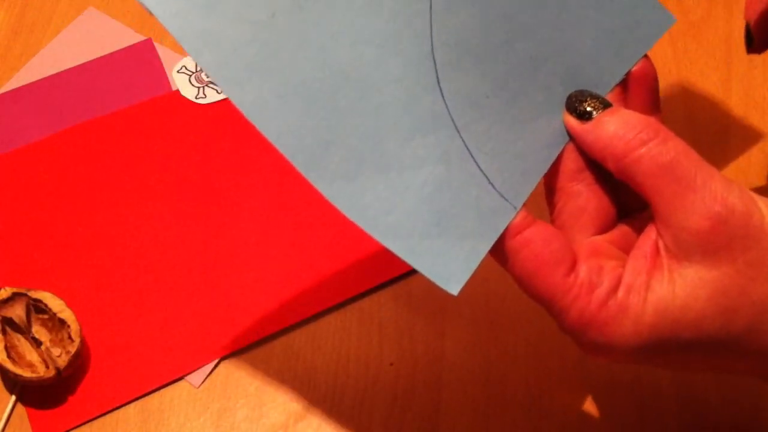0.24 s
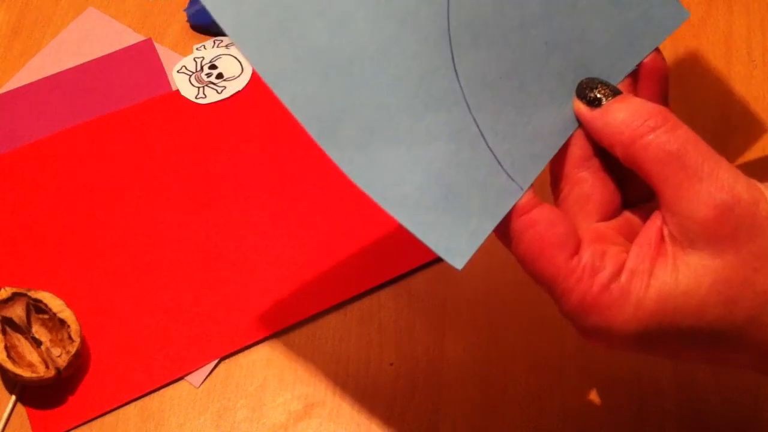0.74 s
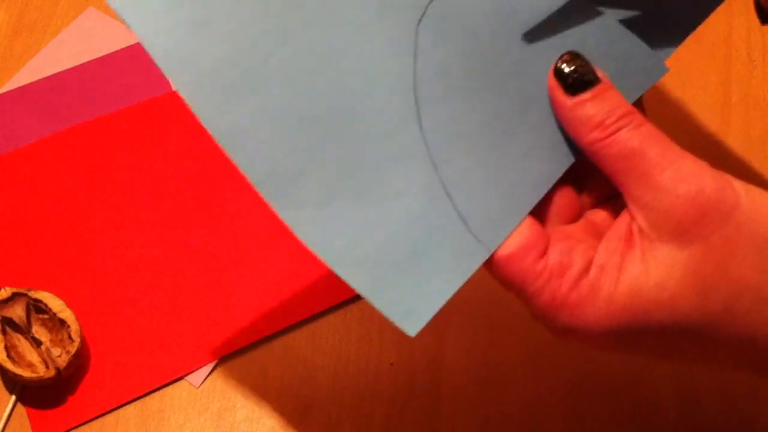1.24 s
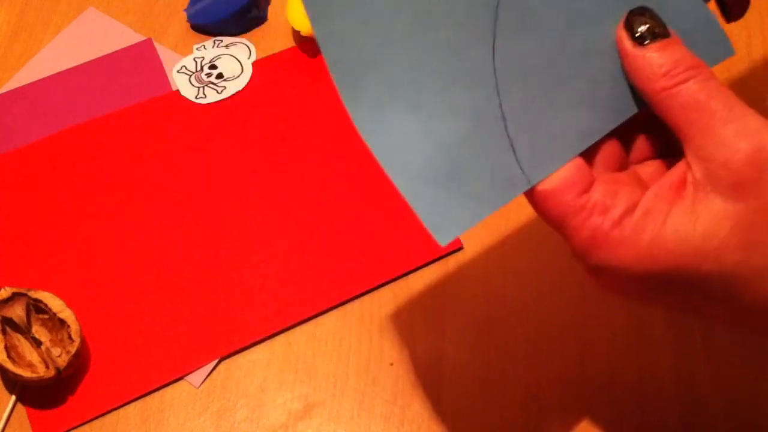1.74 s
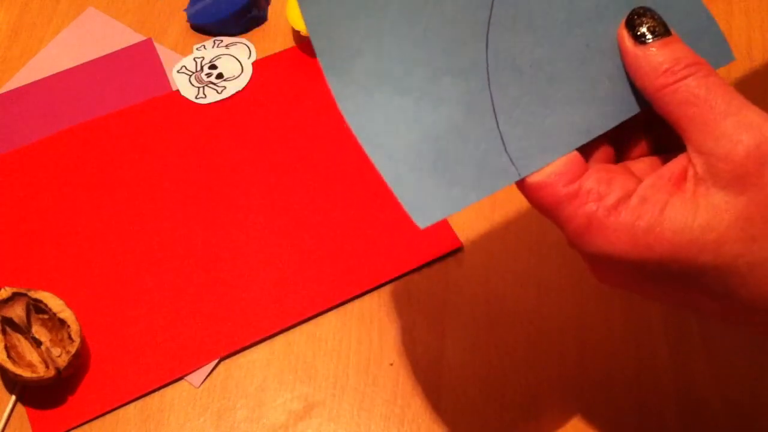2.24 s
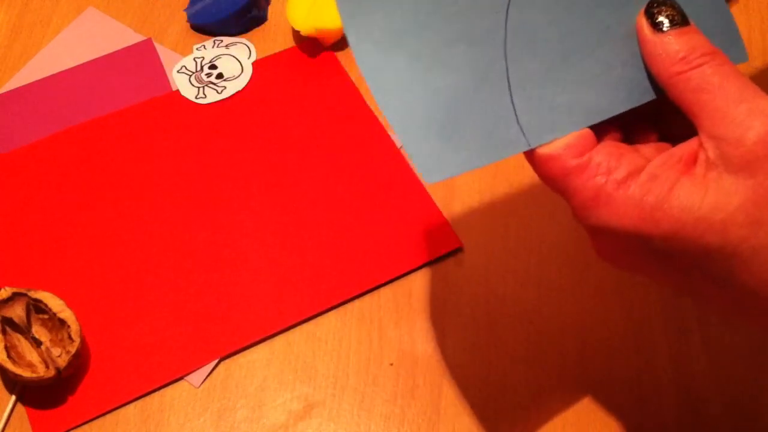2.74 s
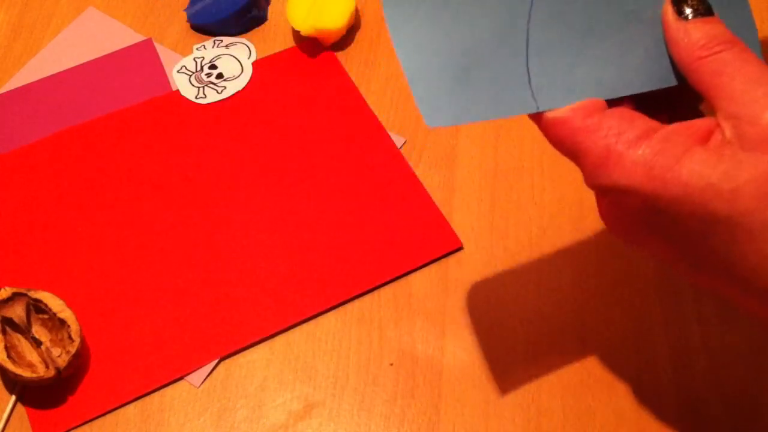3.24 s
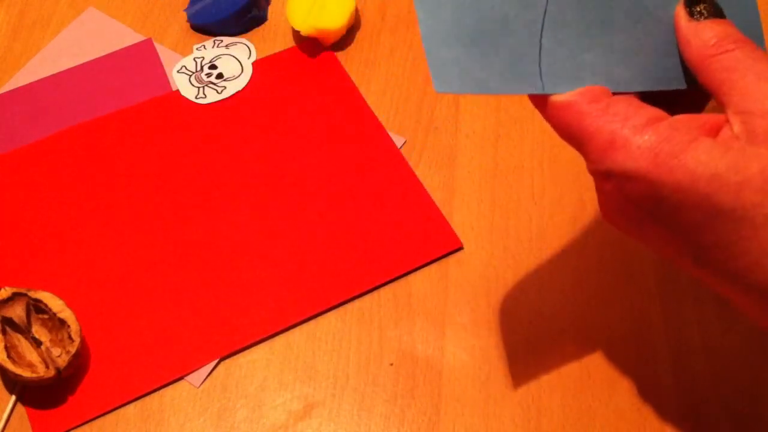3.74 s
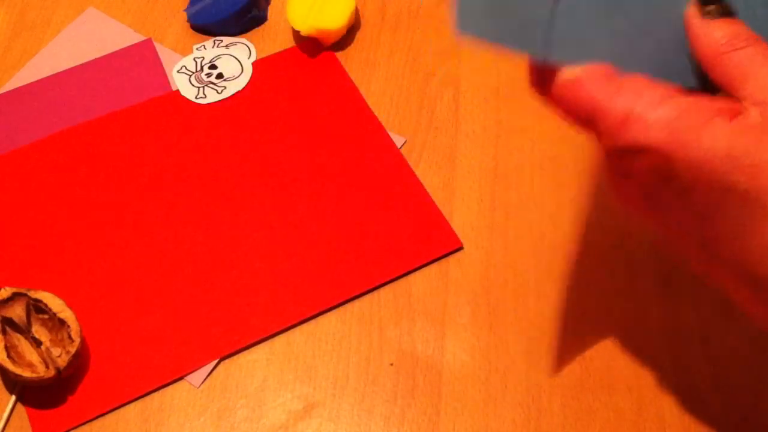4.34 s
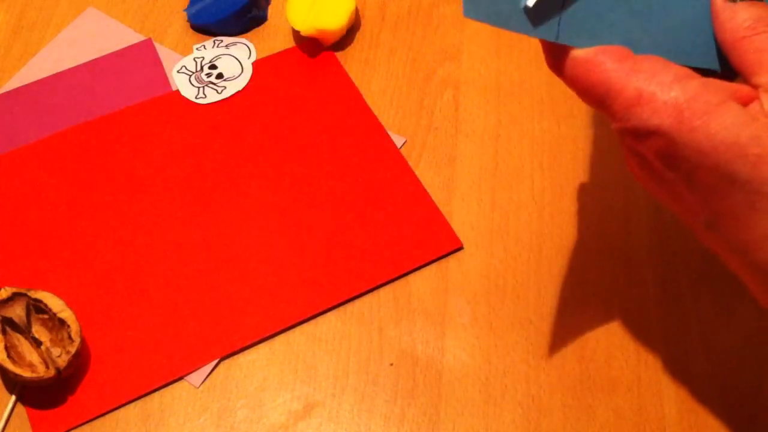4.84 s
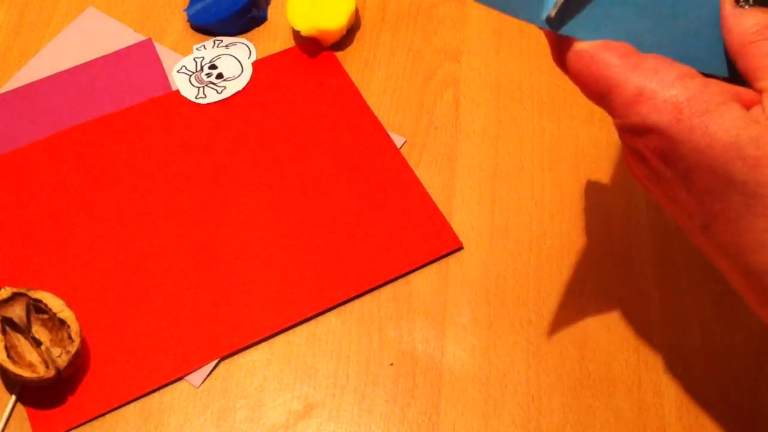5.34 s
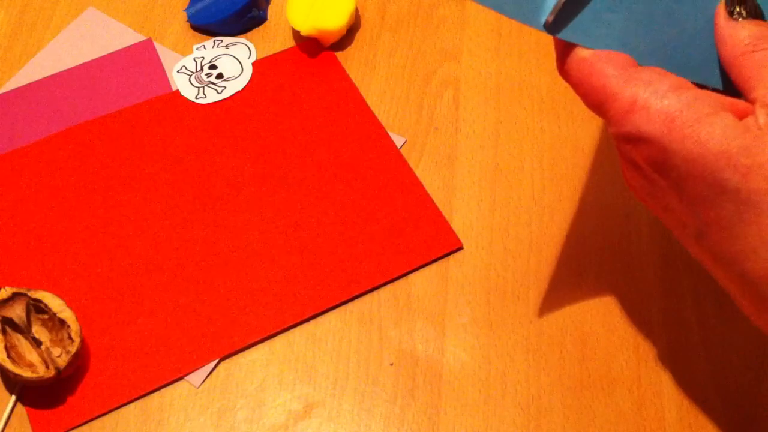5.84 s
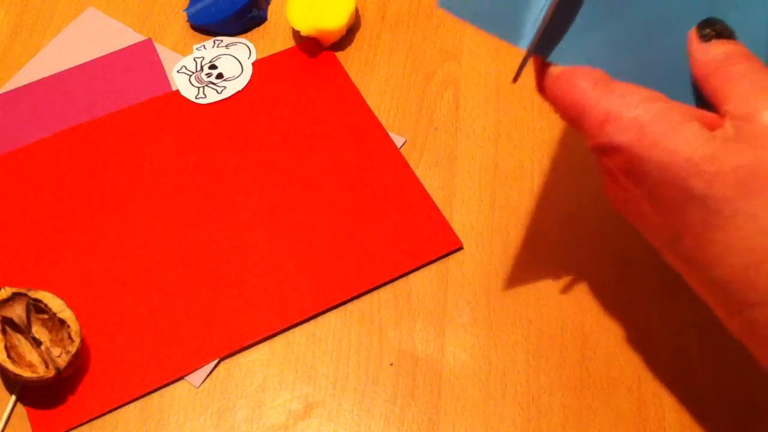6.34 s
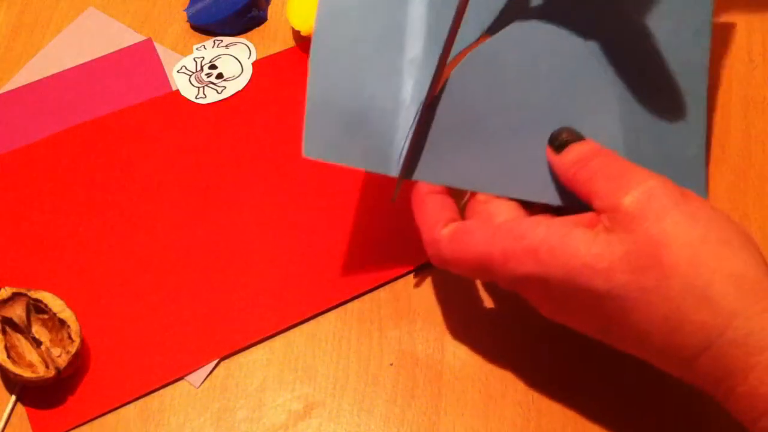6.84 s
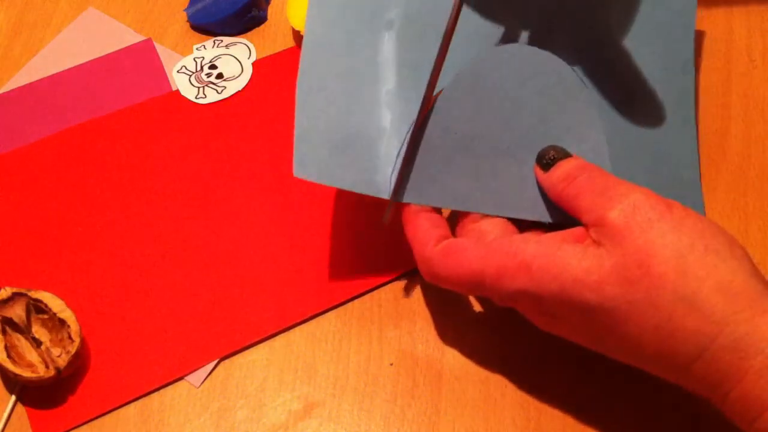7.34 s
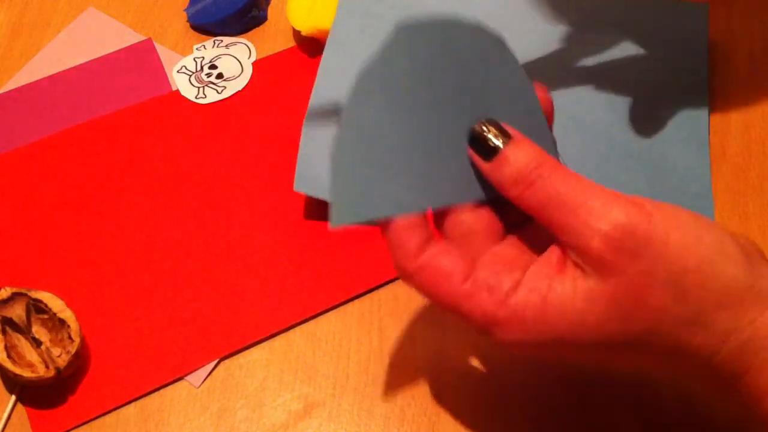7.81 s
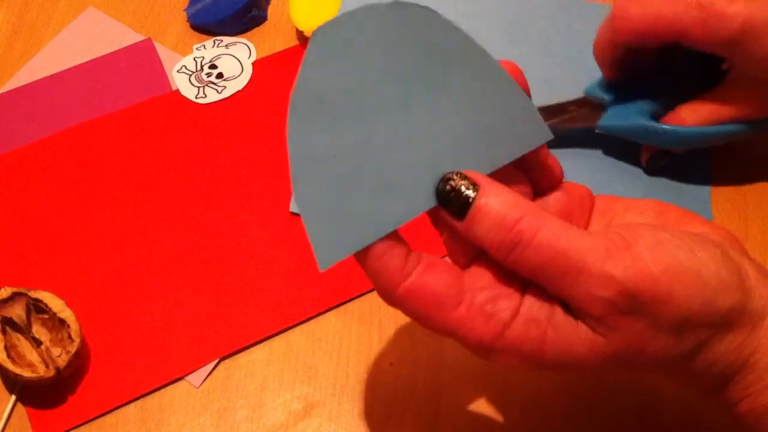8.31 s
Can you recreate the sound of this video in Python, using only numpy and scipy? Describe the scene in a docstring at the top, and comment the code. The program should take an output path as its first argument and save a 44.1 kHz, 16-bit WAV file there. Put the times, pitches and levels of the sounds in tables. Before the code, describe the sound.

Scissors cut a curve in thin card held above a wooden table in a small room. Uneven papery ticks, crisp nips and short shearing crackles come in clusters, with a few low hollow flaps of the sheet. Late on, the blades clack shut loudly, then light card rustles and taps follow. Close phone microphone, short room tail, faint hiss.

```python
"""In a small furnished room, scissors work round a curve in thin card held above a wooden table, close to a phone.
Each nip, pivot tick and buckle is a short noise burst that excites the decaying modes of card and blades.
Each closing stroke shears fibres in a dense crackle through the same bodies; the blades also clack shut and
the sheet flaps at two gliding notes. A wavering table mode, a diffuse room tail, and steady low rumble
and microphone hiss complete the scene."""
import sys
import numpy as np
from scipy import signal
from scipy.fft import rfft, irfft, next_fast_len
from scipy.io import wavfile
from scipy.ndimage import uniform_filter1d

SR = 44100
rng = np.random.default_rng(int(sys.argv[2]) if len(sys.argv) > 2 else 0)


def store_pcm(level_fs):
    """Save levels as 16-bit WAV."""
    pcm = np.round(np.clip(level_fs, -1, 1) * 32767).astype(np.int16)
    wavfile.write(sys.argv[1], SR, np.atleast_2d(pcm).T)


def nominal_scale(level):
    """Amplitude ratio for a level in decibels (scalar or array-like)."""
    x = np.asarray(level, float) / 20
    return 10 ** x


N = 377937

# Nominal modes of the bending card, its cut edge, the blades, and the bright note near the pivot.
# Each row: frequency in hertz, level in dB, time to decay by 60 dB in seconds.
CARD_FLEX_MODES = [(225.4, -16, 0.019), (246.7, -13, 0.057), (415, -10.5, 0.034), (538, 0.5, 0.012),
                   (717, 11, 0.011), (950, 0.5, 0.026), (981, 4, 0.012)]
CARD_EDGE_MODES = [(1376, -8.5, 0.0057), (1866, -1, 0.0063), (2348, -1, 0.0086), (2920, 3.5, 0.0032),
                   (3800, 3, 0.0035), (5140, 7, 0.0023)]
BLADE_MODES = [(6370, 1, 0.0018), (7850, 3.5, 0.00093), (9460, 3.5, 0.0011), (12450, 2.5, 0.0016),
               (14840, -9, 0.0042)]
PIVOT_MODES = [(5030, 1.5, 0.0024), (5000, 1, 0.0023)]
# Bending the card tightens or slackens its upper flex notes.
# Each row: time in seconds, pitch shift in semitones.
CARD_BEND = [(.62, 4), (.714, -0.5), (.965, -2), (2.1, 0.5), (2.686, 2), (3.76, 1.8), (3.88, 4.5),
             (3.99, 1.1), (4.083, -1.5), (4.14, -4.5), (4.2, -1), (4.4, 2), (4.55, -0.5), (4.66, 3),
             (5.0, 1), (5.6, -1)]
# The pivot note shifts as the blades open and close. Each row: time in seconds, pitch shift in semitones.
PIVOT_SHIFT = [(5.599, -0.088), (7.9, 1.5), (8.45, -1.3)]

# how far modes wander in pitch (share) and in strength from one contact to the next
PITCH_SCATTER, LEVEL_SCATTER_DB = 0.04, 2.0


def snips():
    """Impulsive excitation: a rough contact builds up, dies away and drives four resonant bodies."""
    # Nips, ticks and buckles. Each row: time of the contact's peak in seconds, level of the edge sound in dB,
    # level of the card flex relative to it in dB, build-up over 20 dB in milliseconds.
    contacts = [(0.012, -49, 4, 1.5), (0.0275, -48.5, 11, 1), (0.1099, -36, 7.5, 0.42),
                (0.2148, -39.5, -4.5, 23), (0.6214, -28.5, 5, 0.14), (0.714, -22.5, 1, 1.33),
                (0.7378, -40, -19, 6.6), (0.9651, -25.5, 10, 0.27), (1.0048, -36, -8, 31),
                (1.1258, -34, -15, 5.2), (1.205, -56, -2, 1.5), (1.392, -40.5, 0.5, 12),
                (1.6055, -33, -20, 0.22), (1.6773, -38, -8.5, 63), (2.0786, -46.5, -8, 2.1),
                (2.097, -42.5, -0.5, 8.3), (2.1172, -42, -2.5, 6.9), (2.134, -43, -3, 3),
                (2.1755, -41.5, -2.5, 13), (2.2064, -46.5, -1, 2.2), (2.322, -40.5, -1.5, 3.2),
                (2.4934, -34.5, -2.5, 7.9), (2.056, -49.5, -4, 5.2), (2.412, -47.5, -3.5, 3.7),
                (4.919, -51, -37, 0.58), (2.521, -36.5, -3, 1.7), (2.5872, -35, -3.5, 6.6),
                (2.686, -32.5, 9.5, 1.7), (2.7066, -38.5, 1, 31), (2.7363, -34, 0.5, 2.5),
                (2.763, -40, 1.5, 11), (2.8193, -39.5, -1, 9.3), (2.9273, -41, -8.5, 19),
                (2.951, -36, -2, 1.6), (2.977, -40, 0.5, 5.5), (2.991, -40.5, 2.5, 3.3),
                (3.4018, -23.5, -13, 0.12), (3.7105, -35.5, -6.5, 0.62), (3.758, -36, 2.5, 0.89),
                (3.8813, -28, -5.5, 1.6), (3.9928, -29, -4.5, 0.18), (4.0828, -30.5, 0, 0.46),
                (4.1407, -31, -0.5, 0.17), (4.186, -23, -4.5, 0.36), (4.206, -33, 5.5, 1.3),
                (4.2145, -31, -11.5, 21), (4.2403, -42.5, -7, 1.8), (4.2657, -43, -6, 0.51),
                (4.3281, -45.5, -11, 0.55), (4.5525, -37.5, 1, 0.31), (4.803, -59.5, 1.5, 2.1),
                (4.9444, -30.5, -10.5, 3), (4.9774, -36.5, -4.5, 5.2), (5.0093, -32.5, -3, 3.1),
                (5.06, -36.5, -4, 9.1), (5.137, -38.5, -5, 10), (5.2465, -42.5, 0.5, 2.4),
                (5.3004, -45, 2.5, 25), (5.3656, -45, -10, 7.1), (5.3747, -43, -6.5, 16),
                (5.4818, -35, -7, 4.7), (5.62, -28, -8, 2.4), (5.638, -35, -17, 1.7),
                (5.669, -39.5, -7.5, 3.9), (5.7, -47.5, -12, 3), (5.7333, -47.5, -8, 4),
                (5.7859, -30, -14, 2), (5.82, -38, -17, 0.47), (6.2492, -44.5, -4.5, 5.6),
                (6.261, -47, 4.5, 0.61), (6.28, -38.5, -10.5, 11), (6.3037, -31.5, -11.5, 5.9),
                (6.4409, -36, -12.5, 5.8), (6.741, -40.5, -8.5, 10), (6.8501, -45.5, -16.5, 2.9),
                (7.1251, -35.5, -15.5, 3.2), (7.15, -35.5, -25, 0.51), (7.364, -41, -10, 1.2),
                (7.4444, -17.5, -16.5, 3.1), (7.532, -35.5, -18, 2.1), (7.5452, -40, -9.5, 4.2),
                (7.569, -44, -12.5, 15), (7.905, -55.5, -3, 8.6), (8.07, -36.5, -16.5, 0.7),
                (8.0826, -30, -18.5, 0.1), (8.097, -41, -13, 36), (8.3818, -34.5, -13.5, 0.13)]
    lead_s = 0.02
    buckle, snap, snap_ms = 40, 8, 0.95
    tremble_db, tremble_t60 = -23, 0.11
    die_ms, die_ms_per_db, die_ref_db, die_per_build = 6.97, 0.2059, -36, 0.048
    out, t = np.zeros(N), np.arange(SR // 6) / SR - lead_s
    chance = rng.standard_normal((len(contacts), 3, len(t) + 20))
    tremble = nominal_scale(tremble_db) * fade(t, tremble_t60) * (t > 0)
    for (s, db, flex_db, up_ms), row in zip(contacts, chance):
        _, blade_db, pivot_db = grip(s)
        # a stronger contact lasts longer, a sudden one ends sooner; slopes are times to fall 20 dB
        down_ms = (die_ms + die_ms_per_db * (db - die_ref_db)) * up_ms ** die_per_build
        span = np.where(t < 0, up_ms, down_ms) / 1000
        contact = row[:, 20:] * (nominal_scale(-20 * np.abs(t) / span) + tremble)
        # only a sudden contact buckles the card and parts fibres at once
        contact[:, int(lead_s * SR)] = np.array([buckle, snap, snap]) / (1 + (up_ms / snap_ms) ** 2)
        flex_tilt, edge_tilt, blade_tilt = tilts(flex_db, blade_db)
        card = bent(CARD_FLEX_MODES, CARD_BEND, s)
        pivot = bent(PIVOT_MODES, PIVOT_SHIFT, s)
        flex_ring = ring(card, PITCH_SCATTER / 2, LEVEL_SCATTER_DB, row[0], flex_tilt)
        edge_ring = ring(CARD_EDGE_MODES, PITCH_SCATTER, LEVEL_SCATTER_DB, row[1], edge_tilt)
        blade_ring = ring(BLADE_MODES, PITCH_SCATTER, LEVEL_SCATTER_DB, row[2], blade_tilt)
        pivot_ring = ring(pivot, PITCH_SCATTER / 2, LEVEL_SCATTER_DB, row[2, 10:])
        skip = max(int((lead_s - s) * SR), 0)  # a build-up that would start before time zero is trimmed
        for drive, body, share_db in ((contact[0], flex_ring, flex_db), (contact[1], edge_ring, 0),
                                      (contact[2], blade_ring, blade_db), (contact[2], pivot_ring, pivot_db)):
            add(out, max(s - lead_s, 0), signal.fftconvolve(drive, body)[skip:], db + share_db)
    return out


def crackle():
    """Fracture noise: fibres part in a dense random series of uneven cracks with lone pops."""
    spread_db, flutter_hz, flutter_db = 2.5, 110, 1.5
    pops_per_s, pop_db, pop_spread_db = 400, 10, 2.5
    cracks = rng.standard_normal(N) * nominal_scale(spread_db * np.minimum(rng.exponential(size=N), 5))
    hold = int(SR / flutter_hz)
    steps = np.repeat(rng.standard_normal(N // 200), hold)[:N]
    flutter = uniform_filter1d(steps, hold // 2)
    pops = (rng.random(N) < pops_per_s / SR) * nominal_scale(pop_db + pop_spread_db * rng.random(N))
    return cracks * nominal_scale(flutter_db * flutter) + pops


def shear():
    """Continuous excitation: each stroke bites in, swells and lets go, its crackle filtered by the bodies."""
    # Blades shearing or fingers sliding. Each row: start in seconds, swell in milliseconds,
    # let-go in milliseconds, level of the edge sound in dB.
    strokes = [(0.262, 12, 44, -66), (0.338, 7.9, 21, -67), (0.405, 37, 35, -67.5), (0.984, 2.9, 160, -56),
               (1.115, 5.7, 58, -53), (1.378, 70, 99, -62), (1.49, 123, 23, -56.5), (1.603, 6.4, 62, -45),
               (1.704, 7.8, 39, -53.5), (1.763, 38, 72, -48.5), (2.038, 105, 140, -66),
               (2.26, 40, 216, -63.5), (2.533, 19, 190, -62), (2.928, 44, 29, -56), (3.02, 16, 122, -59.5),
               (3.13, 38, 590, -72), (3.386, 12, 40, -45), (3.598, 36, 500, -63), (4.364, 7, 37, -50.5),
               (4.4, 12, 45, -46), (4.425, 37, 55, -47), (4.555, 51, 158, -52.5), (4.689, 73, 49, -59.5),
               (5.205, 25, 74, -61.5), (5.342, 89, 20, -70), (5.792, 64, 23, -64.5), (6.009, 7.4, 32, -47),
               (6.036, 30, 39, -47.5), (6.582, 20, 95, -67.5), (6.671, 34, 82, -58), (6.845, 41, 42, -67.5),
               (7.22, 2, 28, -58.5), (7.78, 46, 76, -62.5), (7.86, 57, 133, -61), (8.09, 6.7, 170, -62.5),
               (8.208, 24, 130, -61), (8.39, 30, 70, -64.5), (8.461, 112, 90, -49)]
    bite, ease, blade_power = 0.89, 1.47, 0.18  # exponents of the force
    drift_hz, drift_db, grip_damp = 35, 3.5, 0.84
    # a sliding edge excites the blades more than a nip, and the pivot less
    slide_db = [0, 3, -11]
    cracks = crackle()
    hold = int(SR / drift_hz)
    steps = np.repeat(rng.standard_normal((4, N // 200)), hold, axis=1)[:, :N]
    drift = nominal_scale(drift_db * uniform_filter1d(steps, hold))
    out = np.zeros(N)
    for (start, swell_ms, go_ms, db), row in zip(strokes, rng.standard_normal((len(strokes), 2, 20))):
        flex_db, blade_db, pivot_db = grip(start) + slide_db
        first = int(start * SR)
        now = np.arange(first, min(first + int((swell_ms + go_ms) * SR / 1000), N))
        ms = (now - first) * 1000 / SR
        closing = np.interp(ms, [0, swell_ms, swell_ms + go_ms], [0, 1, 0])
        force = np.sin(np.pi / 2 * closing) ** np.where(ms < swell_ms, bite, ease)
        flex_tilt, edge_tilt, _ = tilts(flex_db, blade_db)
        bodies = []
        for i in now[[0, -1]]:  # the card as bent at the start and at the end of the stroke
            card = bent(CARD_FLEX_MODES, CARD_BEND, i / SR) * [1, 1, grip_damp]
            bodies.append(ring(card, PITCH_SCATTER / 2, LEVEL_SCATTER_DB, row[0], flex_tilt))
        bodies.append(ring(CARD_EDGE_MODES, PITCH_SCATTER / 2, LEVEL_SCATTER_DB / 2, row[1], edge_tilt))
        bodies.append(ring(BLADE_MODES))
        bodies.append(ring(bent(PIVOT_MODES, PIVOT_SHIFT, start)))
        early, late, edge, blade, pivot = (
            unit(signal.fftconvolve(cracks[now], body)[:len(now)]) for body in bodies)
        turn = np.pi / 2 * ms / ms[-1]  # the bend changes along the stroke
        flex = np.cos(turn) ** 2 * early + np.sin(turn) ** 2 * late
        # each body wakes unevenly as the grain of the card changes
        flex, edge, blade, pivot = drift[:, now] * [flex, edge, blade, pivot]
        mix = edge + nominal_scale(flex_db) * flex + nominal_scale(pivot_db) * pivot
        mix += nominal_scale(blade_db) * force ** blade_power * blade
        out[now] += nominal_scale(db) * force * mix
    return out


def shut():
    """Free vibration after impact: the handles meet with a short chatter and the loose blades buzz on."""
    # The blades clack together. Each row: time in seconds, peak level in dB.
    clacks = [(0.9705, -23), (7.4467, -7)]
    # Modes of the free blades. Each row: frequency in hertz, level in dB, 60 dB decay time in seconds.
    free_blades = [(1430, -12.5, 0.0094), (2510, -3.5, 0.0019), (5900, 2, 0.00187), (6260, -10, 0.015),
                   (6685, 0, 0.0075), (10900, 4.5, 0.00083)]
    chatter_t60, rattle_db, rattle_t60 = 0.014, -24, 0.17
    out, t = np.zeros(N), np.arange(SR // 5) / SR
    envelope = fade(t, chatter_t60) + nominal_scale(rattle_db) * fade(t, rattle_t60)
    chatter = rng.standard_normal((len(clacks), len(t))) * envelope
    for (s, db), row in zip(clacks, chatter):
        add(out, s, signal.fftconvolve(row, ring(free_blades)), db)
    return out


def flaps():
    """Tension-dependent pitch: the sheet snaps through and its two lowest notes sink unsteadily as it eases."""
    # The whole sheet flaps. Each row: time in seconds, peak level in dB,
    # pitch about which the lower note settles in hertz.
    snaps = [(0.965, -34, 183), (1.601, -47, 180), (2.69, -33, 180), (3.402, -40.5, 199), (3.43, -38, 156),
             (3.481, -48, 143), (3.764, -47.5, 213), (3.89, -46.5, 220), (5.799, -53, 189.5)]
    t60, stretch, slack_s, wobble = 0.1, 0.29, 0.017, 0.16
    upper_ratio, upper_db, upper_t60 = 1.447, -5, 0.17
    out, t = np.zeros(N), np.arange(SR // 4) / SR
    for (s, db, hz), row in zip(snaps, rng.standard_normal((len(snaps), 40))):
        loose = wobble * np.interp(t * 120, np.arange(40), row)
        tension = stretch * np.exp(-t / slack_s)
        phase = 2 * np.pi * np.cumsum(hz * (1 + tension + loose)) / SR
        lower = fade(t, t60) * np.sin(phase)
        upper = nominal_scale(upper_db) * fade(t, upper_t60) * np.sin(upper_ratio * phase)
        add(out, s, lower + upper, db)
    return out


def table():
    """Lightly damped resonance: a low wooden mode fades slowly, wavering in strength and pitch."""
    # The table top hums after the scissors are laid down. One row: time in seconds, peak level in dB,
    # central frequency in hertz, 60 dB decay time in seconds.
    hum = (8.085, -62, 259, 2.0)
    hold, waver_db, waver_hz = SR // 24, 8, 9
    out, t = np.zeros(N), np.arange(SR) / SR
    s, db, hz, t60 = hum
    steps = np.repeat(rng.standard_normal((2, 40)), hold, axis=1)
    level, pitch = uniform_filter1d(steps, hold)[:, :SR]
    phase = 2 * np.pi * np.cumsum(hz + waver_hz * pitch) / SR
    add(out, s, fade(t, t60) * nominal_scale(waver_db * np.minimum(level, 1)) * np.sin(phase), db)
    return out


def room(x):
    """Diffuse reverberation: table top and walls return a short decaying tail, duller than the source."""
    t60, tail_db, dull_hz = 0.16, -16, 2290
    t = np.arange(SR // 3) / SR
    tail = rng.standard_normal(len(t)) * fade(t, t60) * (t > 0.004)
    tail = signal.lfilter(*signal.butter(1, dull_hz, fs=SR), tail)
    return nominal_scale(tail_db) * signal.fftconvolve(x, tail / np.linalg.norm(tail))[:N]


def quiet():
    """Stationary noise shaped in frequency: steady house rumble and microphone hiss."""
    # Shape of the noise spectrum. Each row: frequency in hertz, relative density in dB per hertz.
    spectrum = [(25, -4.5), (40, -27.5), (60, -17), (100, -19), (150, -3.5), (300, -12), (520, -17),
                (4000, -21.5), (16000, -24.5)]
    rms_db = -69
    hz, db = np.transpose(spectrum)
    size = next_fast_len(N)
    f = np.arange(1, size // 2 + 2) * SR / size
    gain = nominal_scale(np.interp(np.log(f), np.log(hz), db))
    noise = irfft(rfft(rng.standard_normal(size)) * gain, size)[:N]
    return nominal_scale(rms_db) * unit(noise)


def grip(s):
    """Changing coupling: card flex, blade and pivot shares in dB at a time, as the grip and free card vary."""
    # Each row: time in seconds, then the levels of card flex, blades and pivot relative to the edge in dB.
    coupling = [(0, 18, 4.5, -5), (.2, 2.5, -10.5, -27), (.5, 1, -6, -27), (0.621, 6.5, -2.5, -13.5),
                (1.0, -2.5, -2, -22), (1.13, -7, -14, -36), (1.39, -5, -8.5, -14), (1.6, -10.5, -8, -33),
                (1.77, -7, -8.5, -6), (2.1, -4, -4, 0.5), (2.6, -3, -5, -0.5), (3.1, -8, -2.5, -26),
                (3.5, -14.5, -6.5, -4), (4.1, 2, -2.5, -16), (4.4, -5, -3, -22), (4.55, -4.5, 0, -4),
                (4.7, -13, -8, -12), (5.3, -2, 3, 0.5), (5.48, -3, 0, -31), (5.62, -1.5, 2, -29),
                (5.79, -1, -4.5, -15), (6.0, -15.5, -4.5, -9), (6.598, -14, -0.5, -24),
                (7.2, -6.5, -4, -26.5), (7.548, -20, -6, -17.5), (7.85, -21, -0.5, 9),
                (8.071, -16, -4, -15), (8.3, -13, -4, -17), (8.47, -19.5, -4.5, 11.5)]
    at, *shares = np.transpose(coupling)
    return np.array([np.interp(s, at, db) for db in shares])


def tilts(flex_db, blade_db):
    """Spectral slope from contact: dB per octave for the bending, edge and blade modes."""
    # more bending dulls the edge yet stiffens the bend against its lowest notes;
    # a harder contact that wakes the blades favours upper modes
    by_flex, by_blade = 0.62, 0.65
    edge_tilt = by_blade * blade_db - by_flex * (flex_db + 7.0)
    return by_flex * flex_db, edge_tilt, by_blade * blade_db


def bent(modes, curve, s):
    """Stiffness sets pitch: upper modes follow a semitone curve at a time."""
    whole_sheet_hz = 300  # notes below belong to the whole sheet and stay put
    modes = np.array(modes)
    ratio = 2 ** (np.interp(s, *np.transpose(curve)) / 12)
    modes[:, 0] *= np.where(modes[:, 0] > whole_sheet_hz, ratio, 1)
    return modes


def ring(modes, detune=0, scatter_db=0, chance=np.zeros(20), tilt_db=0):
    """Modal superposition: a body's impulse response, its modes scattered in pitch and strength."""
    hz, db, t60 = np.transpose(modes)[:, :, None]
    t, k = np.arange(int(t60.max() * SR)) / SR, len(modes)
    hz = hz * (1 + detune * chance[:k, None])
    db = db + scatter_db * chance[k:2 * k, None] + tilt_db * np.log2(hz / hz[0])
    sign = (-1) ** np.arange(k)[:, None]  # neighbouring modes move in opposition
    return np.sum(sign * nominal_scale(db) * fade(t, t60) * np.sin(2 * np.pi * hz * t), axis=0)


def fade(t, t60):
    """Exponential decay, as of a damped mode, reaching -60 dB at t60."""
    return np.exp(-np.log(1000) * t / t60)


def add(out, s, sound, peak_db):
    """Superposition: place a sound at a time with a given peak."""
    i = int(s * SR)
    part = sound[:N - i]
    out[i:i + len(part)] += part * nominal_scale(peak_db) / np.abs(sound).max()


def unit(x):
    """Normalisation of mean power: scale to rms 1."""
    return x / np.sqrt(np.mean(x ** 2))


def high_pass(x, hz):
    """Inefficient radiation below a corner frequency, as a fourth-order high-pass."""
    return signal.sosfilt(signal.butter(4, hz, "high", fs=SR, output="sos"), x)


def scene():
    """Superposition of the hands' work, its reverberation and the quiet beneath."""
    contacts = high_pass(snips() + shear() + shut(), 166)  # a small contact cannot move the whole sheet
    work = high_pass(contacts + flaps() + table(), 108)  # thin card moves no deep bass
    return (work + room(work) + quiet())[None]


def top_cut(x):
    """Nothing passes above the cut-off."""
    return signal.sosfilt(signal.butter(12, 16650, fs=SR, output="sos"), x)


def record(dry):
    """Band limiting: the phone cuts the top above 16 kHz with a steep low-pass."""
    low_pass = signal.butter(10, 16000, fs=SR, output="sos")
    mix = signal.sosfilt(low_pass, dry)
    return top_cut(mix)


dry = scene()
out = record(dry)
store_pcm(out)
```